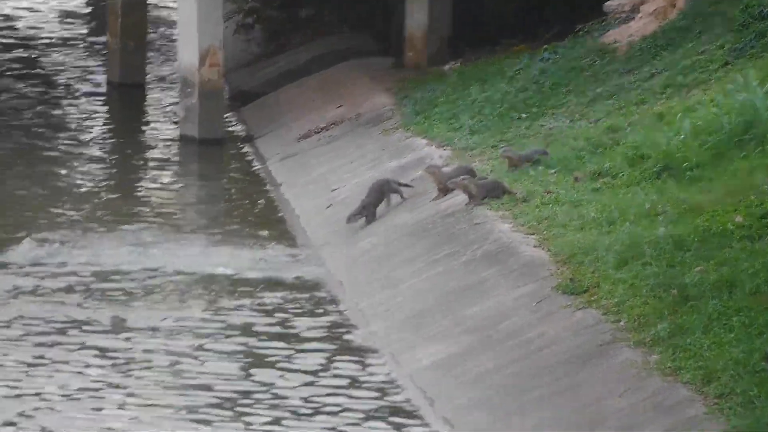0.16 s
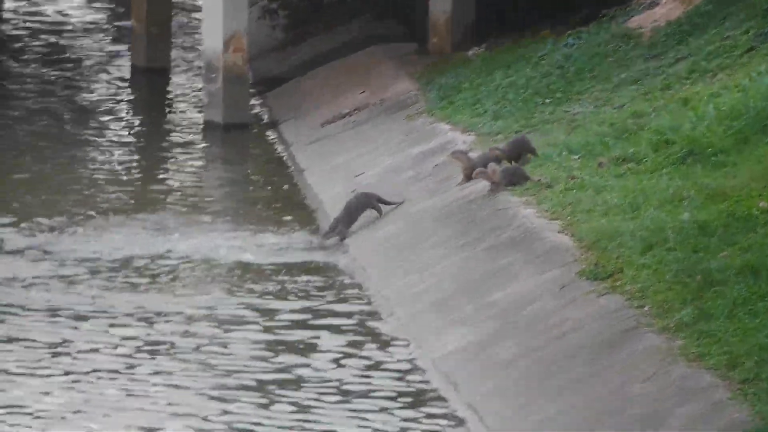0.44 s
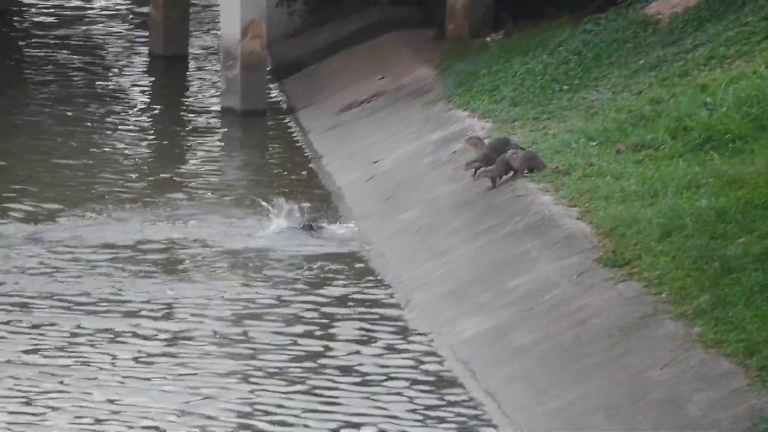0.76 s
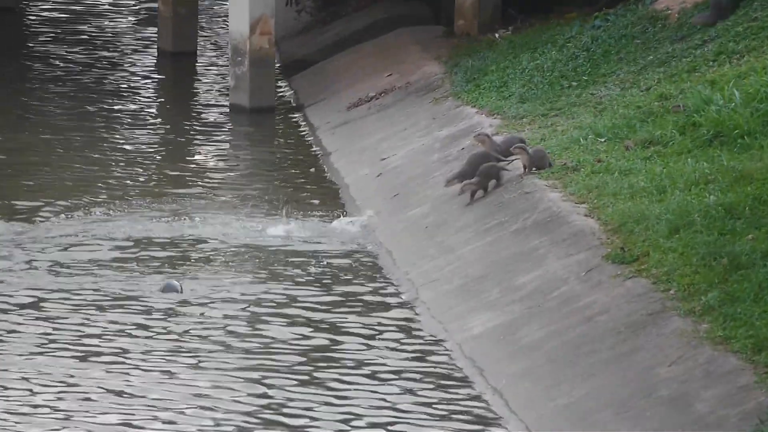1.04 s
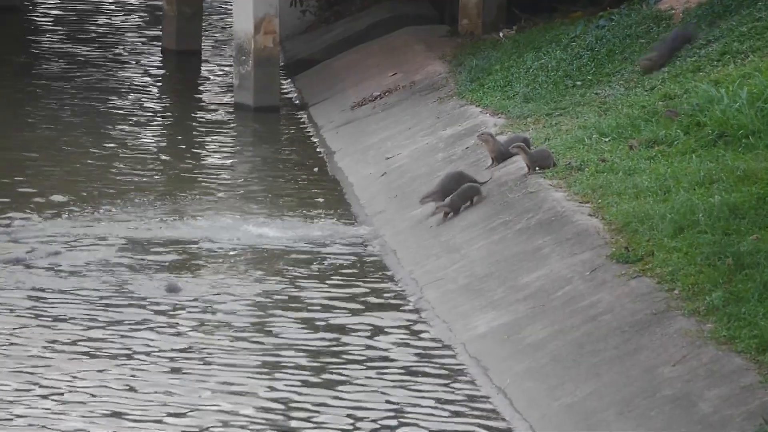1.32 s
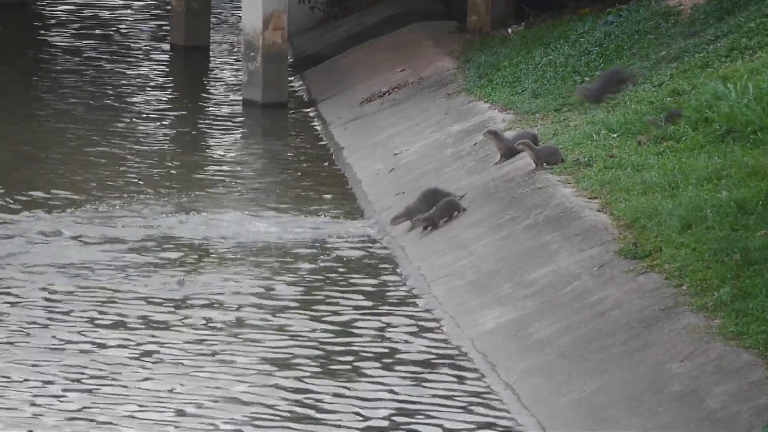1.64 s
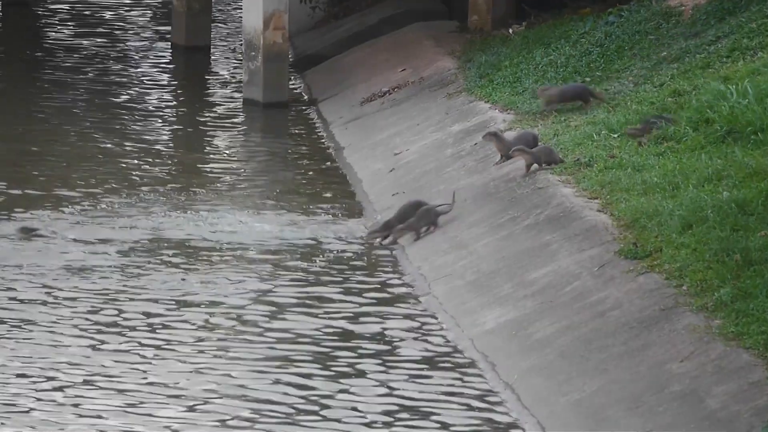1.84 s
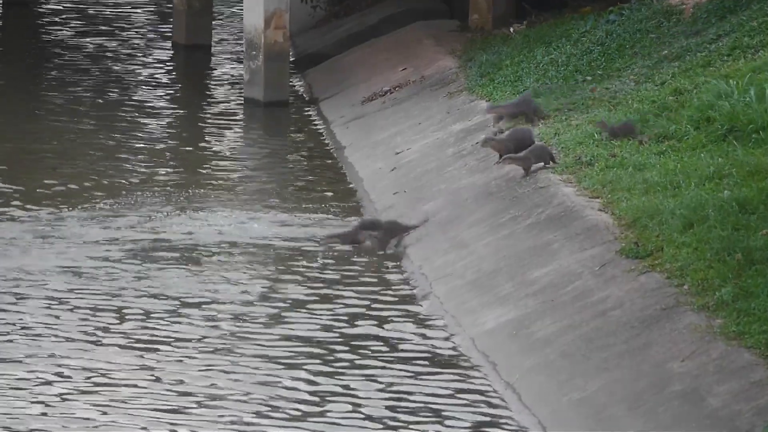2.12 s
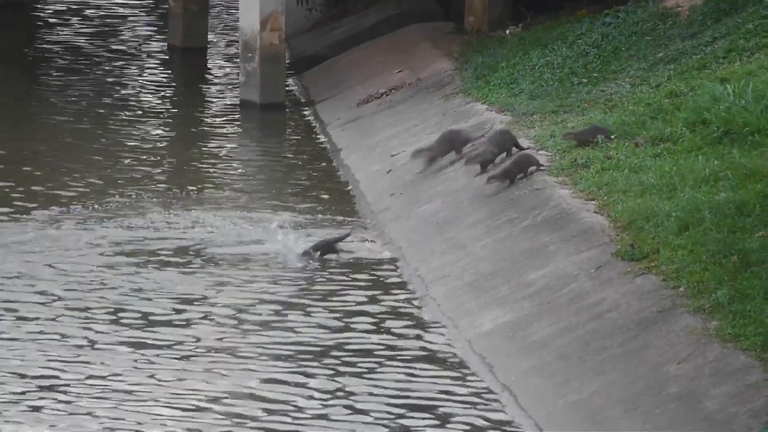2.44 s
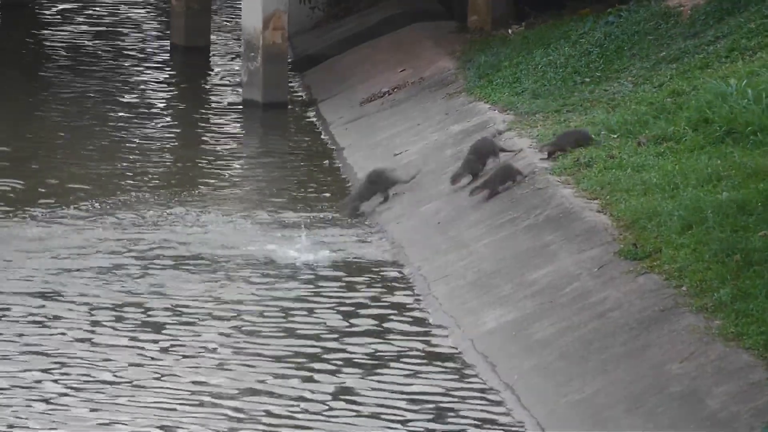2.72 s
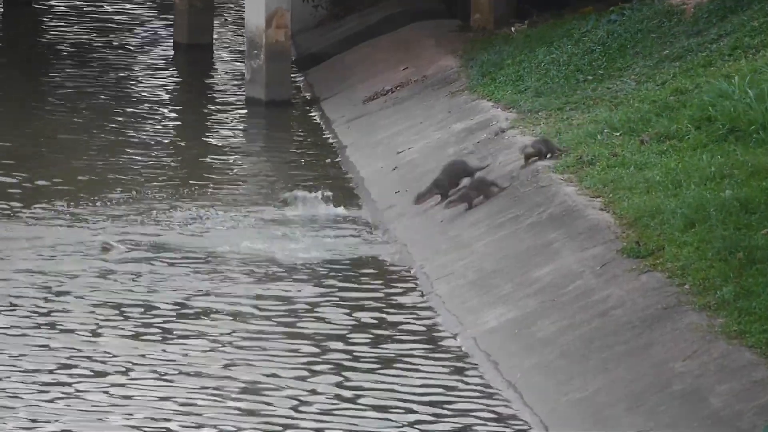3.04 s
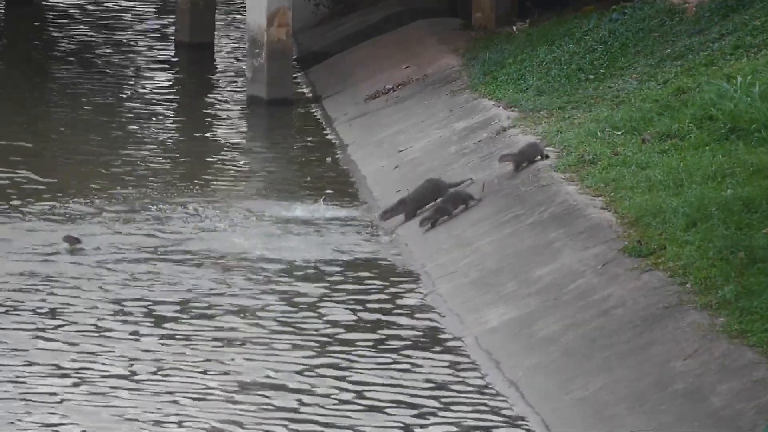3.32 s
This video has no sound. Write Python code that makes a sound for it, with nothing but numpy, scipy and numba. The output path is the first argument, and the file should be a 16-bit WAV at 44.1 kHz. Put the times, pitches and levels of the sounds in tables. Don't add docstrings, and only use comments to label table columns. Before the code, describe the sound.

High, thin otter chirps and whistles come between and through rough wind gusts hitting the microphone early, briefly midway, then strongly near the end; distant traffic, faint insect hiss and tiny splashes lie behind outdoors.

```python
import sys
import numpy as np
from scipy import signal
from scipy.fft import rfft, irfft
from scipy.io import wavfile
from scipy.ndimage import uniform_filter1d
from numba import njit

SR = 44100
rng = np.random.default_rng(int(sys.argv[2]) if len(sys.argv) > 2 else 0)


def voltage_ratio(decibels):
    exponent = np.asarray(decibels, float) / 20
    return 10 ** exponent


def pcm_store(signal):
    levels = np.round(np.clip(np.atleast_2d(signal), -1, 1) * 32767)
    wavfile.write(sys.argv[1], SR, levels.astype(np.int16).T)


N = 153027
T = np.arange(N) / SR
HZ = np.maximum(np.arange(N // 2 + 1) * SR / N, 1)

# [f/Hz, level/dB]
TRAFFIC_COLOUR = [(30, -54), (114, -14.5), (300, -9.5), (800, -1), (2620, -19.5), (9000, -36),
                  (13500, -46.5), (15700, -57)]
# [f/Hz, width/Hz, level/dB]
CICADA = (9820, 1010, -54)
CRICKET = (11700, 1100, -63)
# [start t/s, end t/s]
CRICKET_SINGS = [
    (1.05, 1.6),
    (1.62, 1.78),
    (1.98, 2.4),
    (2.95, 4.5),
]
# [t/s, length/s, level/dB]
SPLASHES = [
    (0.28, 0.12, -50),
    (1.146, 0.091, -54),
    (1.868, 0.07, -48),
    (2.38, 0.053, -48),
    (2.502, 0.045, -44),
]
# [f/Hz, level/dB]
SPRAY_COLOUR = [(800, -21), (2500, 5), (6000, 1.5), (11000, -9), (15000, -30)]
# [t/s, level/dB]
GUST = [(0.0, -53), (0.36, -43.5), (0.66, -19.5), (0.92, -21), (1.05, -44), (1.95, -48.5), (1.98, -23.5),
        (2.19, -23.5), (2.44, -46.5), (2.53, -15.5), (2.61, -20.5), (2.81, -18), (2.86, -23.5), (3.09, -20),
        (3.18, -34.5), (3.33, -22.5), (3.38, -35.5), (3.47, -20.5)]
# [t/s, half length/s, swell/dB, extra rumble/dB]
PUFFS = [(0.44, 0.016, 5, 8), (0.546, 0.016, 0, 6), (0.63, 0.0067, -2, -2), (.64, .008, 1, 5),
         (0.656, .005, -5, -5), (0.669, 0.011, 2.5, 3), (.695, .01, 0, -4), (.715, .008, 4, 1),
         (0.73, .007, -3, 0), (0.755, .01, 2, 3), (0.772, 0.0052, 0, 0), (.862, .005, 5.5, -4),
         (0.879, 0.0063, 5, -3), (0.914, .01, 1, -2), (0.951, 0.0058, 5, -3), (.962, 0.0059, -5, -2),
         (2.111, 0.011, 4, -2), (2.156, 0.0074, 5, 3), (3.09, .008, 2, 1), (3.115, 0.0074, 2, -3),
         (.795, 0.022, 4, -1), (.822, 0.0088, -6, -7), (1, 0.063, 3.5, 5), (1.557, 0.039, 5, 4),
         (1.847, 0.038, 8, 0), (1.963, 0.018, -1, 15), (2.08, .02, -2.5, 10), (2.137, 0.0082, -9, 3),
         (2.189, 0.023, 2, 7), (2.253, 0.022, -7, 8), (2.278, 0.012, 10, 3), (2.425, 0.014, 5.5, 3.5),
         (2.587, 0.028, 1.5, -10), (2.882, 0.018, -6.5, 3), (2.94, .04, 2, -7), (2.99, 0.019, -3.5, 9),
         (3.024, 0.02, 4, -4), (3.061, 0.017, 0.5, -8), (3.217, 0.011, 4, 4), (3.266, 0.009, 6, -16),
         (3.328, 0.025, 3, -12), (3.41, 0.0084, 4, -8), (3.435, 0.0079, 0.5, -4)]
# [t/s, peak level/dB]
BUFFETS = [(.331, -17), (.336, -20), (.506, -26), (0.547, -8), (.577, -10), (0.6, -7), (.733, -9),
           (0.782, -5), (0.8, -5), (.84, -14), (.879, -16), (1.89, -13), (1.982, -12), (2.099, -14),
           (2.151, -8.5), (2.203, -11), (2.501, -14), (2.535, -1), (2.583, -13), (2.625, -2.5),
           (2.659, -15), (2.725, -6), (2.741, -12), (2.759, -17), (2.905, -12), (3.09, -14), (3.303, -13.5),
           (3.352, -11)]
# [f/Hz, level/dB]
WIND_COLOUR = [(30, -71), (100, -39), (200, -11), (400, 1), (650, -3), (1200, -17), (2500, -29.5),
               (5000, -64)]
BUFFET_COLOUR = [(40, -28), (200, 8), (600, 20), (2000, 7.5), (5000, -12), (7500, -29), (16000, -60)]
# [f/Hz, likeness 0-1, left lead/rad, left minus right/dB]
AIR_PORTS = [(60, 0.36, 0.8, 7), (324, 0.63, 0.93, 0.5), (750, 0.95, 0.27, 1.5), (2500, 0.52, 0.75, -0.5),
             (8000, 0.52, 0.12, -2), (13200, 0.39, 0.11, 0)]
WIND_PORTS = [(60, 0.8, 0.36, 19.5), (166, 0.93, 1.18, 4), (313, 0.98, 1.5, 4.5), (774, 1, 2.57, 0.5),
              (2500, 1, 2.49, -1)]
BUFFET_PORTS = [(100, 1, 0.69, 3), (5000, 1, 2.24, 1)]
OTTER_PORTS = [(1000, 1, 0.14, -3.5), (16000, 1, 0.14, -3.5)]
# [top t/s, rise/s, fall/s, top f/Hz, share of pitch gained in the rise]
CHIRPS = [(.002, .03, .05, 5900, .27), (.264, .015, .08, 4300, .22), (1.255, .042, .063, 5500, .45),
          (1.917, .032, .04, 4900, .27), (2.456, .08, .07, 4800, .5), (2.455, .07, .07, 6100, .27),
          (2.555, .027, .052, 4900, .26), (2.556, .014, .04, 4200, .2), (3.13, .03, .1, 7250, .1),
          (3.187, .04, .033, 6030, .15), (3.25, .032, .087, 8200, .16)]
# [top level/dB, rise fade/dB, fall fade/dB, octave level/dB, share of the arch that sounds]
EFFORT = [(-42, -10, -12, -12, .95), (-45, 0, -8, -24, 1), (-53, 2, 5, -2, 1), (-41, -8, -9, -18, 1),
          (-44, -4, -5, -22, .33), (-52, -5, -5, -25, .27), (-30.5, -8, -14, -13, .72),
          (-42, -4, -2, -25, .75), (-43, -30, -26, -14, .62), (-48.5, -5, 2, -25, .9),
          (-42, -26, -40, -25, 1)]
# [f/Hz, level/dB]
MOUTH_COLOUR = [(2000, 0), (8800, 0), (9500, -12), (10600, -10), (11500, 0), (14300, 0), (15500, -14)]
# [t/s, f/Hz, level/dB, octave level/dB]
WHISTLES = [
    [(.835, 6460, -57, -83), (.85, 6670, -50, -76), (.866, 6460, -49, -70), (.9, 6560, -49, -65),
     (.917, 6510, -51, -61), (.941, 5400, -54, -73), (.965, 4060, -52, -84)],
    [(1.578, 6300, -54, -77), (1.586, 6250, -44.5, -70), (1.646, 6140, -51, -61), (1.674, 5940, -59, -63),
     (1.69, 5750, -64, -72)],
    [(1.555, 5800, -62, -72), (1.568, 6400, -55, -65), (1.585, 6740, -61, -76), (1.635, 7530, -43.5, -80),
     (1.655, 7250, -42, -65), (1.68, 6800, -52, -62), (1.703, 5800, -52, -69), (1.728, 4280, -57, -78)],
    [(2.96, 6190, -60, -77), (2.976, 6900, -48, -78), (2.994, 6420, -44, -74), (3.006, 6420, -40, -68),
     (3.05, 6190, -46.5, -69), (3.08, 4800, -46, -75), (3.095, 2500, -56, -80)],
]
# [delay t/s, level/dB]
BOUNCES = [
    (.004, -10),
    (.011, -16),
]

TRAFFIC_DB, WIND_DB, BUFFET_DB = -29, 5.5, 3
BUFFET_TAIL_S, BUFFET_TAIL_DB = 0.0037, -16.5
WOBBLE, FLUTTER_DB, PATCHY_DB = .007, 1.8, 1.2
FALL_SHARE, FAINTEST_DB, RISING_OCTAVE_DB = .42, -16, -7
CHIRP_ECHO_DB, BANK_T60_S, BANK_DB = -8, .45, -6.5
GAIN_TOP_DB, GAIN_RATIO, GAIN_ATTACK_S, GAIN_RELEASE_S = -23, 1.5, 0.027, 0.17


def noise():
    return rng.standard_normal(N)


def level(x, db):
    return x * voltage_ratio(db) / np.sqrt(np.mean(x ** 2))


def along(table, index):
    table = np.array(table, float)
    return np.interp(np.log(HZ), np.log(table[:, 0]), table[:, index])


def colour(x, table):
    return irfft(rfft(x) * voltage_ratio(along(table, index=1)), N)


def band(x, hz, width):
    return irfft(rfft(x) * np.exp(-((HZ - hz) / width) ** 2), N)


def walk(rate):
    hold = int(SR / rate)
    values = rng.standard_normal(4000)
    steps = values[np.arange(N) // hold % 4000]
    return 1.3 * uniform_filter1d(uniform_filter1d(steps, hold), hold)


def ports(shared, twin, table):
    like = np.clip(along(table, index=1), 0, 1)
    half = voltage_ratio(along(table, index=3) / 2) * np.exp(.5j * along(table, index=2))
    mid = rfft(shared) * np.sqrt((1 + like) / 2)
    side = rfft(twin) * np.sqrt((1 - like) / 2)
    return np.array([irfft((mid + side) * half, N), irfft((mid - side) / half, N)])


def traffic():
    swell = walk(2.16)
    spectrum = rfft(noise()) * voltage_ratio(along(TRAFFIC_COLOUR, index=1))
    drone = 0
    for hz in 40 * 2 ** np.arange(0, 9, .5):
        bell = np.cos(np.pi * np.clip(np.log2(HZ / hz), -.5, .5)) ** 2
        drone = drone + voltage_ratio(0.99 * swell + walk(8.74)) * irfft(spectrum * bell, N)
    return level(drone, TRAFFIC_DB)


def insects():
    hz, width, db = CICADA
    cicadas = level(band(noise(), hz, width) * voltage_ratio(walk(3.92) + walk(39.56)), db)
    hz, width, db = CRICKET
    crickets = level(band(noise(), hz, width) * voltage_ratio(2 * walk(29.8)), db)
    song = sum(np.clip(np.minimum(T - start, end - T) / .04, 0, 1) for start, end in CRICKET_SINGS)
    return cicadas + song * crickets


def splashes():
    spray = level(colour(noise() * voltage_ratio(3.2 * walk(900)), SPRAY_COLOUR), 0)
    out = 0
    for s, length, db in SPLASHES:
        fade_in = np.clip((T - s) / 0.01, 0, 1)
        fade_out = np.clip((s + length - T) / 0.026 + 1, 0, 1)
        out = out + spray * voltage_ratio(db) * fade_in * fade_out
    return out


def air():
    return traffic() + insects() + splashes()


def gusts():
    gust = np.interp(T, *np.array(GUST).T)
    bells = [np.exp(-((T - s) / half) ** 2) for s, half, _, _ in PUFFS]
    swell, rumble = np.array(PUFFS)[:, 2:].T @ bells
    eddies = voltage_ratio(swell + 0.73 * walk(45) + 1.25 * walk(140))
    spikes = level(voltage_ratio(2 * walk(90) + 3.04 * walk(250) + 0.27 * (gust + 20)), 0)
    twins = []
    for _ in range(2):
        x = level(colour(noise(), WIND_COLOUR), 0)
        low = band(x, 0, 276)
        high = x - band(x, 0, 960)
        middle = x - low - high
        low_gain = voltage_ratio(-.5 * (gust + 24.5) + rumble + 1.9 * walk(8.97))
        twins.append(voltage_ratio(gust + WIND_DB) * eddies * (middle + low * low_gain + high * spikes))
    return ports(*twins, WIND_PORTS)


def buffets():
    pops = np.zeros(N)
    for s, db in BUFFETS:
        pops[int(s * SR)] = -voltage_ratio(db + BUFFET_DB)
    t = T[:SR // 50]
    tail = rng.standard_normal(len(t)) * np.exp(-t / BUFFET_TAIL_S)
    pops += voltage_ratio(BUFFET_TAIL_DB) * signal.fftconvolve(pops, tail)[:N]
    pops = colour(pops, BUFFET_COLOUR)
    return ports(pops, 0 * pops, BUFFET_PORTS)


def bank(x):
    t = T[:SR // 2]
    tail = rng.standard_normal((2, len(t))) * voltage_ratio(-60 * t / BANK_T60_S) * np.clip(t / 0.012, 0, 1)
    tail = tail / np.sqrt(np.sum(tail[0] ** 2))
    return voltage_ratio(BANK_DB) * signal.fftconvolve(x[None], tail, axes=1)[:, :N]


def squeak(hz, db, octave_db):
    phase = 2 * np.pi * np.cumsum(hz * (1 + WOBBLE * walk(400))) / SR
    flutter = voltage_ratio(FLUTTER_DB * walk(200) + PATCHY_DB * walk(70))
    octave = voltage_ratio(octave_db + 2 * walk(71)) * np.sin(2 * phase)
    return flutter * (voltage_ratio(db) * np.sin(phase) + octave)


def chirps():
    out = 0
    for (top, rise, fall, hz, gained), (db, rise_db, fall_db, octave_db, share) in zip(CHIRPS, EFFORT):
        rising = T < top
        slack = np.clip(np.where(rising, (top - T) / rise, (T - top) / fall), 0, 1.1)
        pitch = hz * (1 - np.where(rising, gained, FALL_SHARE) * slack ** 2)
        fade_db = np.maximum(np.where(rising, rise_db, fall_db) * slack / share, FAINTEST_DB)
        octave = db + octave_db + fade_db / 3 + RISING_OCTAVE_DB * rising
        edge = np.clip((share + .1 - slack) * 10, 0, 1)
        out = out + squeak(pitch, db + fade_db, octave) * edge
    return colour(out, MOUTH_COLOUR)


def whistles():
    out = 0
    for call in WHISTLES:
        s, *columns = np.array(call).T
        hz, db, octave_db = [np.interp(T, s, column) for column in columns]
        edge = np.clip(np.minimum(T - s[0], s[-1] - T) / 0.0037, 0, 1)
        out = out + edge * squeak(hz, db + 6, octave_db + 5)
    return out


def otters():
    chirping, whistling = chirps(), whistles()
    calls = chirping + whistling
    near = calls + sum(voltage_ratio(db) * np.roll(calls, int(s * SR)) for s, db in BOUNCES)
    far = whistling + voltage_ratio(CHIRP_ECHO_DB) * chirping
    return ports(near, 0 * near, OTTER_PORTS) + bank(far)


def scene():
    surroundings = ports(air(), air(), AIR_PORTS)
    return surroundings + gusts() + buffets() + otters()


@njit
def follow(x, attack, release):
    y, e = np.empty(len(x)), x[0]
    for i in range(len(x)):
        e += (x[i] - e) * (attack if x[i] > e else release)
        y[i] = e
    return y


def top_cut(x):
    return signal.sosfilt(signal.butter(12, 15700, fs=SR, output="sos"), x)


def record(dry):
    loudness = np.sqrt(uniform_filter1d(np.mean(dry ** 2, 0), size=441) + 1e-12)
    heard = follow(loudness, 1 / (GAIN_ATTACK_S * SR), 1 / (GAIN_RELEASE_S * SR))
    gain = np.minimum(voltage_ratio(GAIN_TOP_DB) / heard, 1) ** (1 - 1 / GAIN_RATIO)
    return top_cut(dry * gain)


dry = scene()
out = record(dry)
pcm_store(out)
```